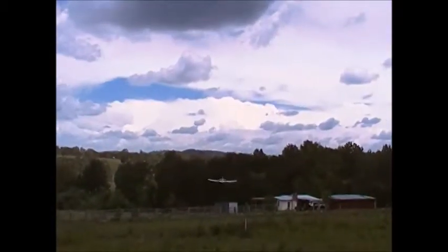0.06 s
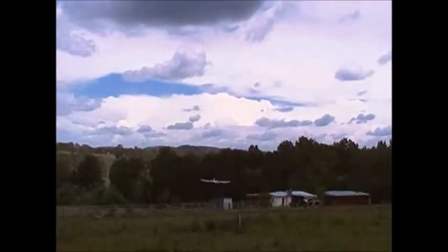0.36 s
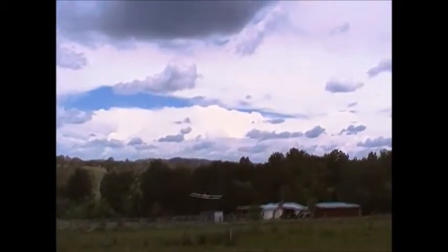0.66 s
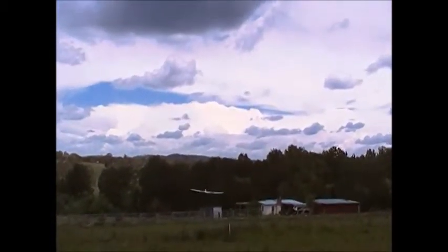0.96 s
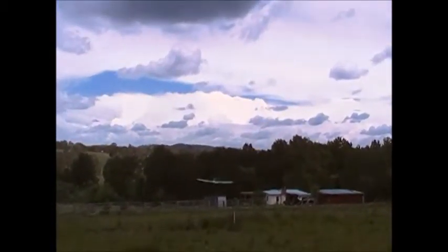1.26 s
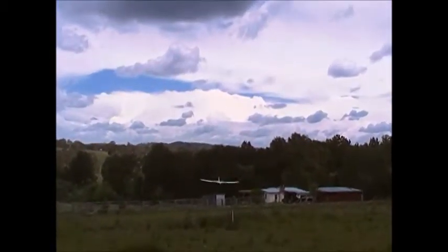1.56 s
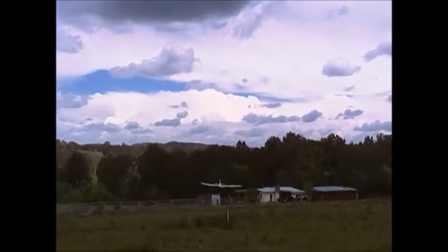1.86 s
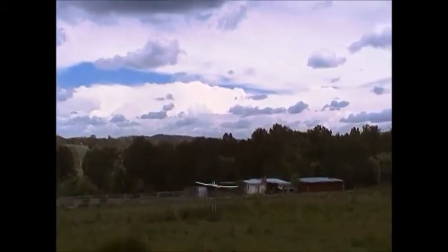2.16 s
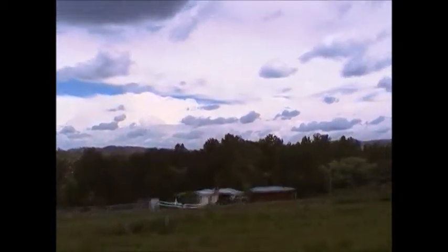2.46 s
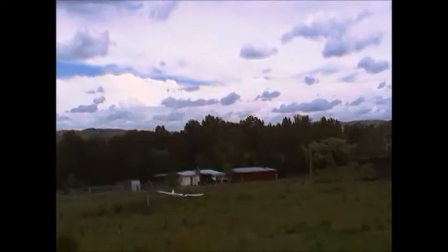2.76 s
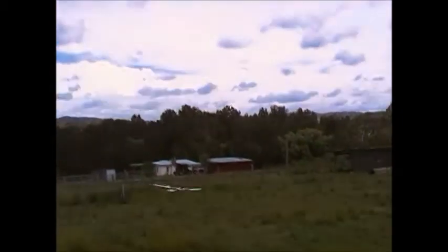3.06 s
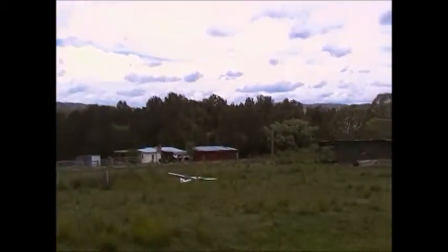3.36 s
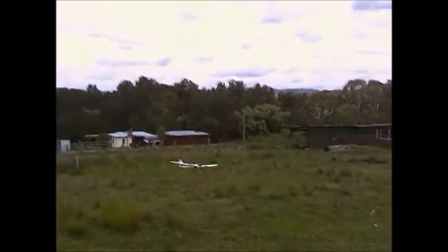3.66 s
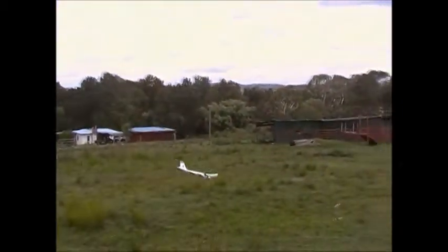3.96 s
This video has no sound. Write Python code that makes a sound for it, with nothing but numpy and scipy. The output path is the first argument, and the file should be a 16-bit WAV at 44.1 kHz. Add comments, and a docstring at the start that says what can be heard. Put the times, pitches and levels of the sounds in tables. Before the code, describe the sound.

A bird sings in an open field, left of the microphone, alternating quick warbles with buzzing notes that slide upward. Wind hisses steadily and rumbles on the microphone, gusting more in the second half, while small birds chirp faintly far off.

```python
"""Bird carolling in an open field

Left of the microphone a bird sings quick warbles and long buzzing slurs that flick upward at the end.
Its throat favours 1.4-2.6 kHz, so low notes sound on their second harmonic; a tree line answers faintly.
Wind rumbles on the microphone over a low hum and steady hiss, with a few faint scuffs, a soft knock
and small birds far off."""
import sys
import numpy as np
from scipy import signal
from scipy.fft import rfft, irfft
from scipy.io import wavfile
from scipy.ndimage import uniform_filter1d

SR = 44100
rng = np.random.default_rng(int(sys.argv[2]) if len(sys.argv) > 2 else 0)


def wav_out(sig):
    """Save sig, one row per channel (or a flat mono array), as 16-bit PCM at SR to the path in sys.argv[1]."""
    wavfile.write(sys.argv[1], SR, np.round(np.clip(np.atleast_2d(sig).T, -1, 1) * 32767).astype(np.int16))


N = 176400
EDGE_S = .005  # time a note takes to open or close


def undb(db):
    """Decibels to gain."""
    return 10 ** (np.asarray(db) / 20)


def curve(t, rows, col=1):
    """Straight lines in time through one column of a table."""
    rows = np.array(rows)
    return np.interp(t, rows[:, 0], rows[:, col])


def at_hz(hz, rows):
    """Read a table on a log-frequency axis."""
    rows = np.array(rows)
    return np.interp(np.log(np.maximum(hz, 1)), np.log(rows[:, 0]), rows[:, 1])


def wander(rate_hz):
    """Smooth random drift with a spread of 1."""
    hold = max(int(SR / rate_hz), 2)
    steps = np.repeat(rng.standard_normal(N // hold + 1), hold)
    drift = uniform_filter1d(uniform_filter1d(steps, hold), hold)[:N]
    return drift / drift.std()


def noise(colour):
    """Coloured stereo noise of rms 1, most alike left and right from 150 to 1200 Hz."""
    # likeness of the microphone's two sides (frequency [Hz], correlation [0-1])
    likeness = [(30, 0.56), (70, 0.01), (150, 0.83), (300, 0.79), (600, .8), (1200, 0.73), (2400, 0.23),
                (4000, 0.11), (12000, 0)]
    hz = np.arange(N // 2 + 1) * SR / N
    alike = at_hz(hz, likeness)
    mid, side = rfft(rng.standard_normal((2, N)))
    mid, side = mid * np.sqrt(1 + alike), side * np.sqrt(1 - alike)
    stereo = irfft(np.array([mid + side, mid - side]) * undb(at_hz(hz, colour)), N)
    return stereo / stereo.std()


def phase_of(hz):
    """Running phase of a pitch curve."""
    return 2 * np.pi * np.cumsum(hz) / SR


def gate(t, start, end):
    """Soft opening and closing of a note."""
    return np.clip(np.minimum(t - start, end - t) / EDGE_S + .5, 0, 1)


def hum(t):
    """A low wavering hum in the background that slowly grows."""
    # tones of the hum (frequency [Hz], level before the swell [dB])
    tones = [(162.4, -61.5), (59.87, -66), (228, -75.5)]
    # its swell (time [s], gain [dB])
    swell = [(0, -2.5), (1.6, -3.5), (2.4, 1), (4, 4.5)]
    flutter_db, pitch_drift = 3, .01813
    out = 0
    for hz, db in tones:
        gain = undb(db + flutter_db * wander(12))
        out = out + gain * np.sin(phase_of(hz * (1 + pitch_drift * wander(23))))
    return np.sqrt(2) * out * undb(curve(t, swell))


def wind(t):
    """Gusts rumble on each side of the microphone on its own, over steady air and hiss."""
    # gusts on the microphone (time [s], left [dB], right [dB])
    gusts = [(0, -58, -59), (0.3, -53.5, -63), (0.49, -50, -54), (0.54, -55, -66), (0.59, -51, -63),
             (0.7, -55.5, -63), (1.0, -51, -63), (1.1, -47, -61), (1.25, -57.5, -55), (1.68, -48.5, -56.5),
             (1.82, -42.5, -53.5), (2.15, -50.5, -55), (2.24, -36.5, -49.5), (2.33, -37, -47),
             (2.4, -46, -50.5), (2.53, -45.5, -43), (2.7, -53, -50.5), (3.0, -51, -41), (3.3, -53, -42),
             (3.48, -51.5, -39), (3.7, -62, -36), (3.85, -53, -45), (4, -54, -54.5)]
    # spectrum of their rumble (frequency [Hz], relative density [dB])
    rumble = [(15, -7.5), (30, -1.5), (60, 2), (95, -2.5), (140, -10), (220, -16), (350, -32), (700, -34.5),
              (2000, -70)]
    # spectrum of the steady air and hiss (frequency [Hz], relative density [dB])
    air = [(25, 2.5), (60, 6.5), (120, 0.5), (200, -9.5), (300, -9), (450, -10.5), (700, -11), (1000, -10),
           (1400, -14), (2100, -13), (3000, -19), (5000, -21.5), (8000, -22), (11000, -23.5), (12000, -37)]
    trim_db, turbulence_db, air_db = -1, 3, -55.5
    gust_db = np.array([curve(t, gusts, 1), curve(t, gusts, 2)]) + turbulence_db * wander(11)
    return noise(rumble) * undb(trim_db + gust_db) + noise(air) * undb(air_db)


def buffets(t):
    """Single eddies push the microphone's diaphragm in and let it swing back."""
    # eddies striking the microphone (time [s], left peak [dB], right peak [dB])
    eddies = [(0.482, -42, -34.5), (.586, -36.5, -55), (1.10, -44, -48), (2.236, -30, -44),
              (2.305, -28.5, -49), (3.414, -54, -33)]
    swing_hz, width_s = 62.4, .0073
    out = 0
    for centre, left_db, right_db in eddies:
        age = t - centre
        swing = np.cos(2 * np.pi * swing_hz * age) * np.exp(-(age / width_s) ** 2)
        out = out - undb([[left_db], [right_db]]) * swing
    return out


def scuffs(t):
    """Faint, brief rubs, some thin and some with a hollow body."""
    # the rubs (peak time [s], level [dB], decay [s], share of body [0-1])
    rubs = [(0.619, -60.5, 0.0093, 0), (1.145, -61, 0.016, 0), (1.58, -58, 0.024, 0.25),
            (2.47, -60, 0.014, 0.24), (2.642, -51.5, .025, 0.76), (3.40, -58, 0.036, 0.42)]
    # spectrum of the hollow body (frequency [Hz], relative density [dB])
    body_colour = [(300, -13), (480, 10), (600, 2), (800, -10), (1250, 3), (1550, 6), (2200, 0), (2800, -4),
                   (3400, -9), (5000, -27), (11000, -32)]
    # spectrum of the thin hiss (frequency [Hz], relative density [dB])
    hiss_colour = [(800, -1), (2500, 8), (4200, 10), (6500, 2), (11000, -26)]
    rise_s = .024
    body, hiss, out = noise(body_colour), noise(hiss_colour), 0
    for peak, db, decay, share in rubs:
        envelope = np.clip((t - peak) / rise_s + 1, 0, 1) * np.exp(-np.maximum(t - peak, 0) / decay)
        out = out + undb(db) * envelope * (share * body + (1 - share) * hiss)
    return out


def knock(t):
    """Brief rough contacts ring a small hollow body."""
    # a soft knock and its settling (time [s], strength [dB])
    contacts = [(2.634, -52), (2.649, -50.5), (2.711, -57)]
    # modes of the body (frequency [Hz], gain [dB], time to fall 60 dB [s])
    modes = [(472, -0.5, 0.11), (610, 0, .08), (1477, 0, 0.07), (1745, 4, 0.07), (2100, -2, .06),
             (3330, -14.5, 0.17)]
    contact_s = .0033
    ring = sum(undb(db - 60 * t / t60) * np.sin(2 * np.pi * hz * t) for hz, db, t60 in modes)
    grit, push = rng.standard_normal(N), 0
    for centre, db in contacts:
        contact = grit * np.exp(-((t - centre) / contact_s) ** 2)
        push = push + undb(db) * contact / np.sqrt(np.sum(contact ** 2))
    return signal.fftconvolve(push, ring)[:N]


def tree_line(t, song):
    """The direct song reaches the microphone, then one clear echo and a thin scatter from the trees."""
    # echo off the trees (delay [s], left [dB], right [dB])
    echoes = [(.052, -14.5, -18)]
    scatter_t60_s, scatter_db = .53, -6.5
    mono = song.mean(axis=0)
    tail = rng.standard_normal((2, N)) * undb(-60 * t / scatter_t60_s)
    tail /= np.sqrt((tail ** 2).sum(axis=1, keepdims=True))
    out = song + undb(scatter_db) * signal.fftconvolve(mono[None], tail, axes=1)[:, :N]
    for delay, left_db, right_db in echoes:
        out = out + undb([[left_db], [right_db]]) * np.interp(t - delay, t, mono, left=0)
    return out


def small_birds(t):
    """Thin, trembling chirps from far across the field."""
    # distant chirps (start [s], length [s], pitch [Hz], glide [Hz/s], level [dB])
    chirps = [(0.039, 0.063, 3900, -11000, -70.5), (1.75, .035, 3850, -14000, -69.5),
              (2.561, 0.15, 3510, -1200, -72), (3.191, 0.071, 7270, 8000, -74),
              (3.215, 0.11, 8400, 500, -80), (3.602, 0.059, 8100, 4500, -78), (3.692, .11, 8460, 2, -75)]
    trill_hz, trill_depth, pitch_jitter = 27.2, .49, .03
    out, waver = np.zeros(N), 1 + pitch_jitter * wander(600)
    for start, length, hz, glide, db in chirps:
        span = (t > start - EDGE_S) & (t < start + length + EDGE_S)
        age = t[span] - start
        trill = 1 + trill_depth * np.sin(2 * np.pi * trill_hz * age)
        tone = np.sin(phase_of((hz + glide * age) * waver[span]))
        out[span] += undb(db) * gate(t[span], start, start + length) * trill * tone
    return out


def whoop(t):
    """A soft, low, arching whistle under one of the warbles."""
    # course of the whistle (time [s], pitch [Hz], level [dB])
    arch = [(2.984, 863, -54), (3.003, 1145, -60), (3.018, 962, -59), (3.035, 760, -55)]
    tone = np.sqrt(2) * np.sin(phase_of(curve(t, arch)))
    return tone * undb(curve(t, arch, 2)) * gate(t, arch[0][0], arch[-1][0])


def syrinx(t, hz, db, buzz_hz, rough, drifts):
    """One note: four harmonics, shaken in level and pitch by a slower vibration, shaped by the throat."""
    # harmonics 1 to 4 at the source (gain [dB])
    harmonics = [2, -1.5, -29.5, -17]
    # throat resonance (frequency [Hz], gain [dB])
    throat = [(500, -19), (800, -21), (1050, -16.5), (1250, -14), (1450, 0.5), (1650, 2), (1780, -2),
              (1890, 0.5), (2050, -3), (2300, -6), (2550, -5.5), (2800, -12), (3500, -28.5), (4600, -27),
              (5200, -22), (8000, -22)]
    # bearing of the bird from the microphone (time [s], left minus right [dB])
    bearing = [(0, 1.7), (2, 4.1), (3.7, 7.8)]
    buzz_depth, buzz_swing, buzz_jitter = .33, .026, .03
    pitch_jitter, flutter_db, trim_db = .0048, .9, -1
    lean_db_per_octave = -8  # partials above 1750 Hz lean right
    buzz_drift, pitch_drift, level_drift = drifts
    buzz_phase = phase_of(buzz_hz * (1 + buzz_jitter * buzz_drift))
    hz = hz * (1 + pitch_jitter * pitch_drift)
    phase = phase_of(hz * (1 + buzz_swing * rough * np.cos(buzz_phase)))
    voice = 0
    for k, harmonic_db in enumerate(harmonics, 1):
        pan_db = curve(t, bearing) + lean_db_per_octave * np.clip(np.log2(k * hz / 1750), 0, .7)
        stereo_db = harmonic_db + at_hz(k * hz, throat) + np.array([pan_db, -pan_db]) / 2
        voice = voice + np.sin(k * phase) * undb(stereo_db)
    buzz = 1 + buzz_depth * rough * np.sin(buzz_phase)
    return np.sqrt(2) * voice * buzz * undb(trim_db + db + flutter_db * level_drift)


def warbles(t, drifts):
    """The main bird's quick, nearly clean whistles, bending in pitch."""
    # one list of points for each note (time [s], pitch [Hz], level before the throat [dB])
    notes = [
        [(0, 1964, -41.5), (.012, 2590, -47), (.021, 2200, -57)],
        [(.055, 2026, -56), (.069, 1680, -52), (.078, 1900, -47), (.084, 2610, -53), (.092, 2600, -56)],
        [(.118, 1910, -66), (.13, 2500, -58), (.15, 2610, -55)],
        [(.19, 2450, -67), (.21, 2620, -54)],
        [(.248, 2440, -59), (.26, 2195, -54.5), (.274, 2430, -59)],
        [(.315, 1990, -56), (.321, 1807, -49), (.331, 1810, -46), (.337, 1915, -44), (.344, 2574, -53),
         (.356, 2515, -44.5), (.376, 2580, -50)],
        [(.426, 1201, -68), (.44, 1056, -45.5), (.46, 1073, -49.5), (.478, 1279, -50.5), (.489, 1488, -49),
         (.498, 1530, -56), (.506, 1930, -41.5), (.513, 2030, -54)],
        [(1.013, 854, -48.5), (1.036, 811, -49), (1.05, 971, -50), (1.078, 1269, -49.5), (1.091, 1570, -58),
         (1.102, 2070, -43)],
        [(1.163, 1970, -51), (1.168, 1828, -47.5), (1.181, 1870, -51.5)],
        [(1.222, 2330, -57), (1.245, 2500, -58), (1.27, 2520, -50.5), (1.288, 2555, -45.5), (1.298, 2240, -59),
         (1.313, 2150, -53)],
        [(1.354, 2020, -52), (1.365, 1690, -57.5), (1.376, 1950, -51)],
        [(1.426, 1216, -54), (1.438, 1684, -61.5), (1.444, 1944, -49.5), (1.459, 2310, -53.5),
         (1.49, 2350, -50)],
        [(1.546, 974, -52), (1.565, 922, -56), (1.58, 851, -48), (1.593, 876, -51), (1.615, 1250, -57),
         (1.634, 1420, -61), (1.65, 2090, -49)],
        [(2.384, 765, -60), (2.402, 839, -51), (2.42, 700, -55), (2.434, 720, -55), (2.452, 922, -51),
         (2.474, 1080, -46.5), (2.489, 1384, -54.5), (2.497, 1880, -57)],
        [(2.496, 1930, -53), (2.503, 1870, -43), (2.521, 1855, -52.5)],
        [(2.544, 1920, -70), (2.568, 1856, -59), (2.58, 1710, -45.5), (2.592, 1760, -58)],
        [(2.63, 2290, -54), (2.655, 2420, -56), (2.698, 2460, -54), (2.707, 2210, -46), (2.727, 1836, -58.5)],
        [(2.773, 1750, -50), (2.780, 1661, -44.5), (2.797, 1650, -56)],
        [(2.825, 1124, -50), (2.85, 1293, -52), (2.858, 1610, -54.5), (2.864, 2044, -50), (2.874, 2040, -56),
         (2.883, 2185, -43.5), (2.892, 2240, -51), (2.904, 2350, -45)],
        [(2.988, 916, -57), (3.003, 858, -49), (3.015, 807, -48.5), (3.028, 863, -53), (3.039, 953, -61),
         (3.049, 1054, -46), (3.072, 1414, -58), (3.086, 1940, -58)],
        [(3.898, 771, -59), (3.912, 829, -50.5), (3.932, 705, -56), (3.946, 695, -62), (3.958, 810, -53.5),
         (3.973, 1040, -49), (3.987, 1060, -44.5), (4, 1270, -62)],
    ]
    out = np.zeros((2, N))
    for note in notes:
        start, end = note[0][0], note[-1][0]
        span = (t > start - EDGE_S) & (t < end + EDGE_S)
        pitch, level_db = curve(t[span], note), curve(t[span], note, 2)
        voice = syrinx(t[span], pitch, level_db, buzz_hz=142.5, rough=.28, drifts=drifts[:, span])
        out[:, span] += gate(t[span], start, end) * voice
    return out


def slurs(t, drifts):
    """The main bird's long buzzing notes start hoarse, climb steadily, then flick up as they fade."""
    # slurred notes (start [s], length [s], pitch [Hz], climb [Hz/s], final pitch [Hz],
    # level before the throat [dB], attack [s], fade [dB], buzz rate [Hz], hoarseness [factor])
    notes = [ (.573, .113, 967, 2270, 2176, -50, 0.0036, 2, 148, 0.4),
             (0.758, .153, 886, 1750, 2180, -49, 0.0046, 5.5, 184.6, 0.56),
             (1.768, 0.18, 759.5, 1249, 1910, -51.5, 0.012, 5.5, 173.3, 0.76),
             (2.071, .212, 765, 872, 1550, -49.5, 0.028, 8.5, 161.5, 1),
             (3.197, .218, 735, 858, 1465, -49, 0.042, 9.5, 155, 1.02),
             (3.553, 0.23, 742, 769, 1140, -48.5, 0.06, 13, 157.4, 0.9), ]
    scoop_hz, scoop_s, flick_s = 55, .0224, .0095
    onset_db, fade_power = 11.5, 2.74
    extra_hoarse, hoarse_s = .8, .035
    out, waver = np.zeros((2, N)), 1 + .007 * wander(60)
    for start, length, hz, climb, final_hz, db, attack, fade_db, buzz_hz, hoarse in notes:
        span = (t > start - EDGE_S) & (t < start + length + EDGE_S)
        age = np.clip(t[span] - start, 0, length)
        scoop = scoop_hz * np.exp(-age / scoop_s)
        flick = (final_hz - hz - climb * length) * np.exp((age - length) / flick_s)
        pitch = (hz + climb * age - scoop + flick) * waver[span]
        level_db = db - onset_db * np.exp(-age / attack) - fade_db * (age / length) ** fade_power
        rough = hoarse * (1 + extra_hoarse * np.exp(-age / hoarse_s))
        voice = syrinx(t[span], pitch, level_db, buzz_hz, rough, drifts[:, span])
        out[:, span] += gate(t[span], start, start + length) * voice
    return out


def scene():
    """Birdsong and its echo across the field, with scuffs, a knock, wind on the microphone and hum."""
    t = np.arange(N) / SR
    drifts = np.array([wander(80), wander(200), wander(120)])  # the bird's buzz rate, pitch and level
    song = warbles(t, drifts) + slurs(t, drifts) + whoop(t) + small_birds(t)
    return tree_line(t, song) + scuffs(t) + knock(t) + wind(t) + buffets(t) + hum(t)


def record(dry):
    """The recorder cuts the top steeply above 11.8 kHz."""
    return signal.sosfilt(signal.ellip(10, .2, 70, 11800, fs=SR, output="sos"), dry)


dry = scene()
out = record(dry)
wav_out(out)
```